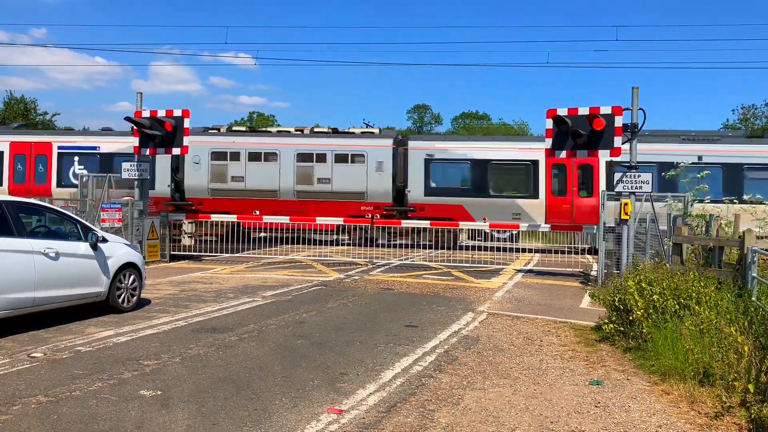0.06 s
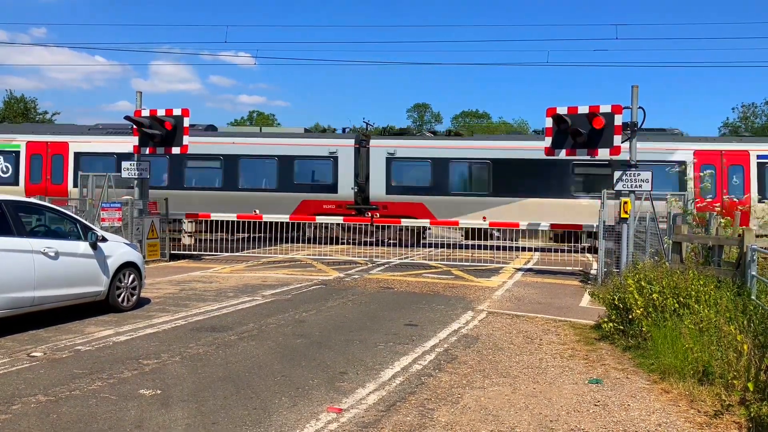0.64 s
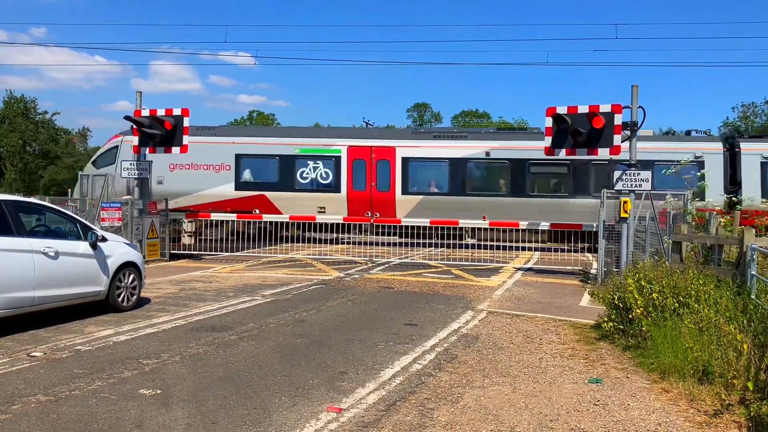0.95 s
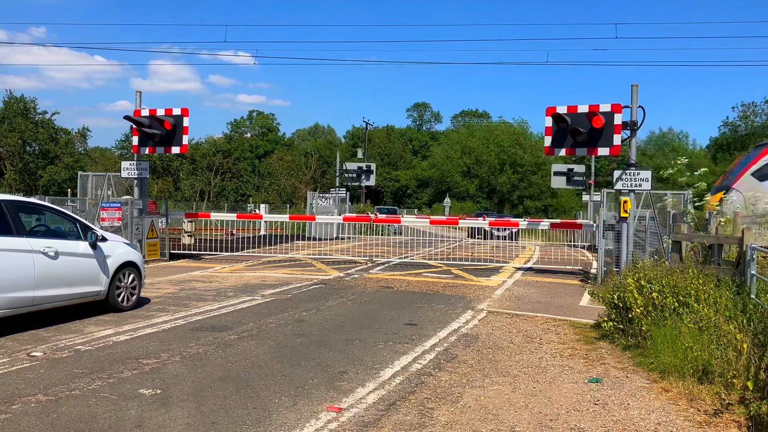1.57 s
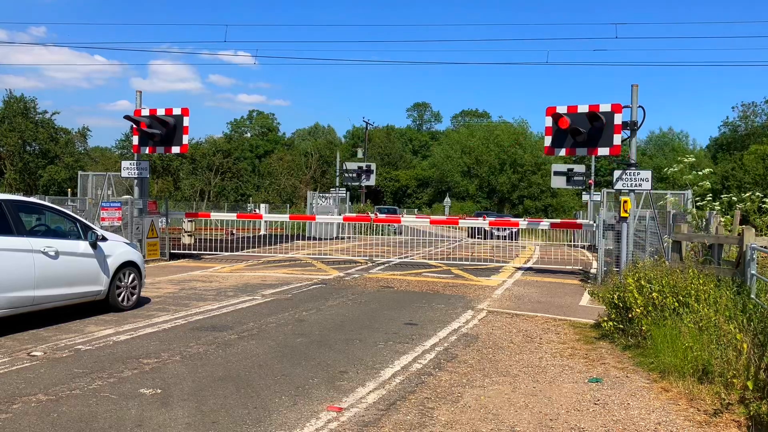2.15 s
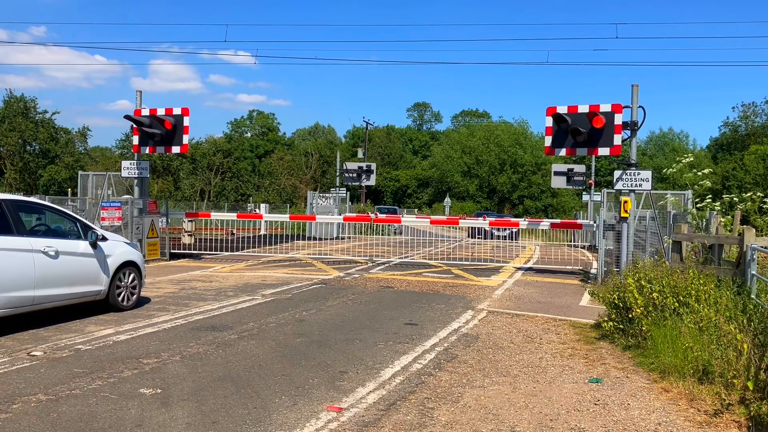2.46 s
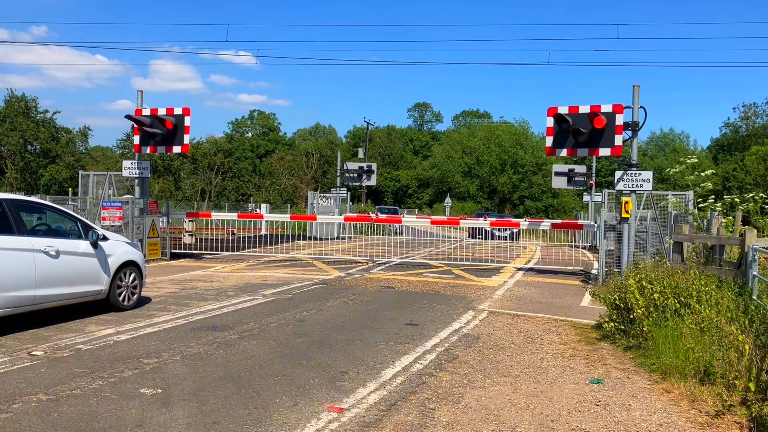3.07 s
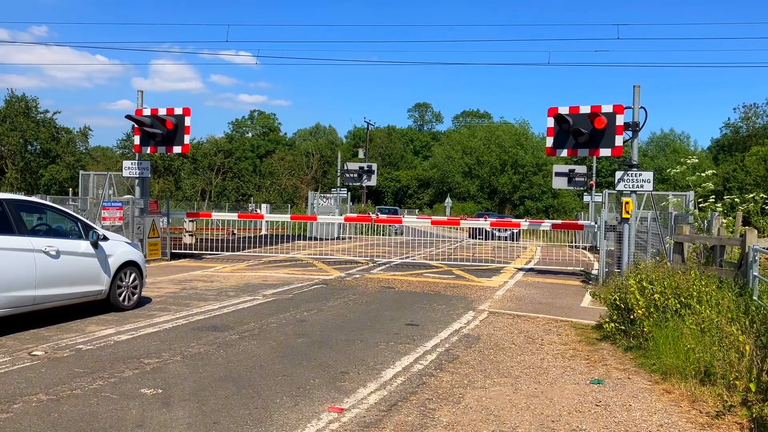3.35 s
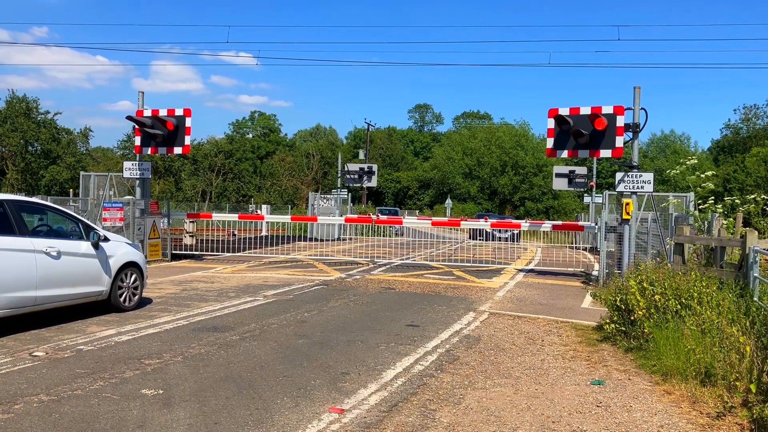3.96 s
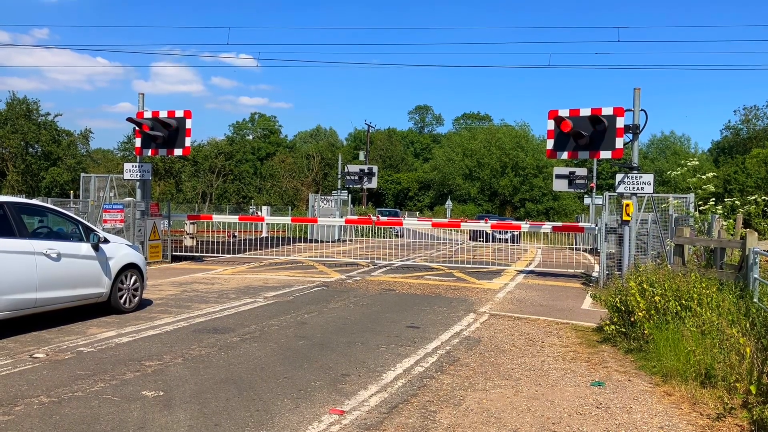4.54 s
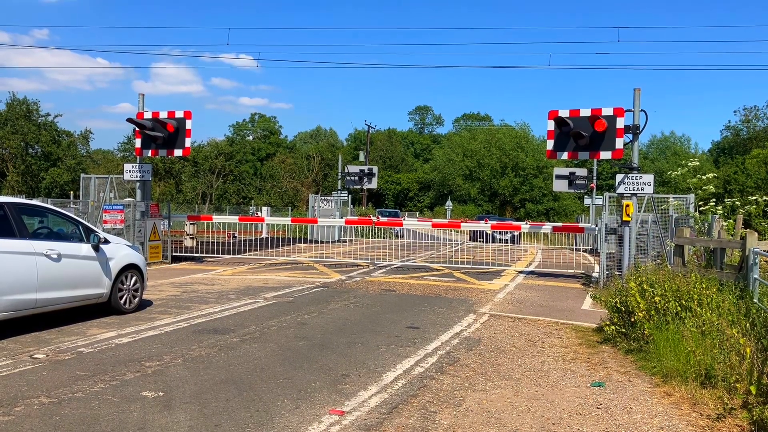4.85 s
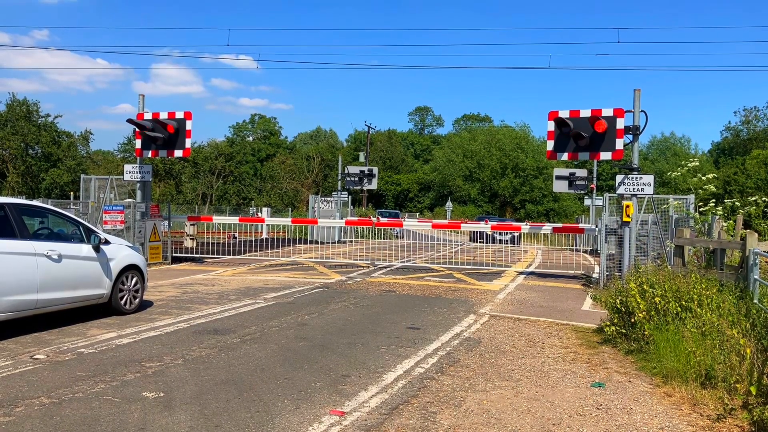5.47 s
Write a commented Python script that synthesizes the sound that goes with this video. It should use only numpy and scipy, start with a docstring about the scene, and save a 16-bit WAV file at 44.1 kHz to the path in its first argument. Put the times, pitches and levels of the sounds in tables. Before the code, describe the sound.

Heard in stereo from a short way back from the track, in open country air, a train passes loudly with paired wheel knocks, steel ringing and hiss. Its roar dulls and fades off to the right, leaving a soft, steady hum from the crossing barrier. Then a car slightly to the left clicks, cranks, catches and idles, much quieter than the train. Last comes a single thin bird whistle.

```python
"""A passenger train rushes past, roaring and hissing, its wheels thumping in pairs over a country crossing.
From a stereo microphone 26 m off the track it rumbles away to the right with singing wheels
and gliding bands of hiss. The barrier's drive hums throughout. To the left of the microphone a waiting
car clunks its starter, fires and settles into idle. Last, a small bird calls once in the open air."""
import sys
import numpy as np
from scipy import signal
from scipy.fft import rfft, irfft
from scipy.io import wavfile
from scipy.ndimage import uniform_filter1d

SR = 44100
rng = np.random.default_rng(int(sys.argv[2]) if len(sys.argv) > 2 else 0)


def unload_audio(sound):
    """Save the sound as a 16-bit wav file, at the path given as the first command line argument."""
    columns = np.transpose(np.atleast_2d(sound))
    # keep every value between -1 and 1, then stretch to whole-number steps
    steps = np.round(np.clip(columns, -1, 1) * 32767)
    wavfile.write(sys.argv[1], SR, steps.astype(np.int16))


N = 242991
TIME = np.arange(N) / SR
FREQS = np.maximum(np.fft.rfftfreq(N, 1 / SR), 1)

TRACK_DISTANCE_M, TRAIN_M_PER_S, SOUND_M_PER_S = 26, 34.3, 343
TAIL_S = 1.271   # the last carriage draws level with the microphone
DOWN_LINE_LAG_MS, CAR_LAG_MS = 0.32, -0.23   # left channel behind right: positive lies to the right

# sound reaching the microphone straight from its source: (frequency [Hz], share [0..1])
DIRECT_SHARE = [(100, 0.94), (600, 0.8), (1200, 0.62), (2100, 0.26), (3000, 0.18), (5000, 0.1), (8000, 0)]
# how alike the two microphone ports hear scattered sound: (frequency [Hz], likeness [-1..1])
PORT_LIKENESS = [(100, 0.97), (500, 0.03), (1500, -0.29), (3300, -0.49), (6000, 0.05), (7300, 0.7),
                 (9100, -1), (11000, 0.96), (12100, 0.65), (13500, -0.85)]
# spectra of the ground, the bogies, the roar close by and far off, and the treble hiss:
# (frequency [Hz], relative density [dB])
GROUND_SPECTRUM = [(28, -53), (35, -18), (43, -5), (52, 1.5), (70, -0.5), (90, -8), (125, -13),
                   (170, -22.5), (400, -58)]
BOGIE_SPECTRUM = [(80, -14), (140, -6), (215, -1), (290, -6), (380, -7.5), (550, -6), (720, -22),
                  (1100, -26)]
NEAR_ROAR_SPECTRUM = [(450, -51), (720, -11), (900, 1.5), (1040, -2), (1300, -5.5), (1600, -6),
                      (2000, -3.5), (2380, -9), (2700, -13), (4000, -72)]
FAR_ROAR_SPECTRUM = [(300, -3), (500, -1), (750, -1.5), (900, 2), (1080, -4), (1300, -4), (1700, -11.5),
                     (2200, -12), (2480, -33), (2850, -16.5), (3500, -18.5), (3850, -27), (4300, -22),
                     (5300, -22)]
HISS_SPECTRUM = [(2400, 2.5), (3000, 4), (3700, 4.5), (4500, -1), (6000, -3.5), (7400, -5.5), (9500, -12),
                 (12000, -12), (15500, -22.5)]
# low rumble at the microphone, fading unevenly as the train leaves: (time [s], level [dB])
GROUND_LEVELS = [(0.0, -20.5), (0.6, -18.5), (1.35, -23.5), (1.85, -27.5), (2.05, -33), (2.5, -35),
                 (2.68, -37.5), (3.1, -40), (3.23, -44), (3.32, -37), (3.6, -39), (3.75, -44.5),
                 (4.2, -43.5), (5.5, -44)]
# carriages going by, before trim and distance loss: (time [s], roar level [dB], hiss level [dB])
CARRIAGE_LEVELS = [(0.0, -25.5, -34.5), (0.11, -25.5, -37), (0.28, -23, -36.5), (0.45, -23.5, -34.5),
                   (0.555, -26, -39), (0.70, -26, -38.5), (0.86, -25, -37), (1.004, -25.5, -42),
                   (1.05, -22.5, -36), (1.182, -23, -38.5), (1.375, -25.5, -39), (1.43, -28, -44),
                   (1.65, -30, -45.5), (2.25, -29.8, -45), (2.7, -25.5, -46.5), (3.9, -18.5, -51)]
# steel wheels ringing as they roll: (frequency [Hz], width [Hz], relative level [dB])
ROLLING_NOTES = [(957, 34, -4), (1044, 30, -3), (1199, 29, -10.5), (1547, 22, -6.5), (1750, 20, -12.5),
                 (2005, 18, -8.5), (2350, 18, -9.5), (4160, 31, -21.5), (4350, 28, -18.5), (5050, 30, -19),
                 (5300, 38, -23)]
# how distance colours the hiss: (frequency [Hz], gain [dB])
FAR_HISS_EQ = [(3000, 2), (5200, -4.5), (6600, -1.5), (7600, -5), (11000, 0.5)]
# still country air: (frequency [Hz], relative density [dB])
AIR_SPECTRUM = [(30, -33), (48, -10.5), (75, -6), (160, -18.5), (440, -17), (620, -21.5), (830, -19),
                (1050, -18.5), (1550, -29), (2100, -21.5), (2800, -34), (7400, -45.5), (11500, -52),
                (15500, -66)]
# wheels scraping along the rail: (time [s], level [dB])
SCRAPE_HITS = [(0.012, -32), (0.421, -39), (1.047, -35), (1.086, -36), (1.336, -51), (1.49, -28.5),
               (1.548, -33.5)]
# axles striking the crossing, two to a bogie, each striking again at a second joint just beyond: # (time [s],
# knock level [dB], thud level [dB], delay to second strike [s], second strike gain [dB])
AXLE_HITS = [(0.019, -16.5, -15, 0.028, -2.5), (0.088, -25.5, -18, 0.026, -4.5),
             (0.378, -12, -22, 0.02, -11), (0.451, -20, -19.5, 0.016, -1.5),
             (0.582, -12.5, -15, 0.021, -10.5), (0.654, -19.5, -15, 0.022, -14),
             (1.015, -14.5, -22.5, 0.028, -5), (1.098, -21.5, -16.5, 0.023, -6),
             (1.462, -17.5, -26, 0.026, 0), (1.535, -14.5, -22.5, 0.03, -6.5)]
# resonances rung by a scrape, a knock and a thud: (frequency [Hz], width [Hz], gain [dB])
SCRAPE_MODES = [(1630, 200, 7.5), (3600, 630, -5), (4360, 780, 0.5), (5500, 420, 2), (6800, 330, 0),
                (10800, 1200, -6)]
RAIL_MODES = [(377, 76, 24), (463, 73, -17), (560, 31, -3)]
BOGIE_MODES = [(171, 46, -6.5), (216.4, 28, 9.5)]
# flanges grazing the rail: (peak time [s], half length [s], frequency [Hz], width [Hz], level [dB])
FLANGE_GRAZES = [(0.22, 0.098, 2334, 170, -34.5), (0.79, 0.051, 992, 110, -26.5),
                 (0.889, 0.027, 1880, 170, -28.5), (1.164, 0.025, 2154, 200, -31),
                 (1.175, 0.029, 1067, 140, -19.5), (1.238, 0.011, 1950, 240, -25),
                 (1.253, 0.034, 1082, 140, -23.5), (1.322, 0.017, 1160, 140, -23),
                 (1.385, 0.013, 1003, 60, -26)]
# notes of the departing wheels: (far-off frequency [Hz], width [Hz], peak level [dB], fall [dB/s])
SINGING_NOTES = [(1060, 38, -42, 5), (2070, 58, -52.5, 11), (3600, 49, -59, 6.5), (3840, 34, -58.5, 22),
                 (4170, 73, -69, 10)]
# narrow, gliding bands of hiss:
# (start [s], end [s], start frequency [Hz], end frequency [Hz], width [Hz], start level [dB])
HISS_BANDS = [(1.4, 2.364, 7230, 7050, 200, -57), (1.58, 2.292, 4500, 4260, 220, -50.5),
              (2.15, 3.156, 3400, 3010, 180, -55.5), (2.3, 3.102, 5860, 6330, 330, -64)]
# the car's starter, relay first and then pinion: (time [s], level [dB])
STARTER_CLICKS = [(3.831, -59), (4.072, -52), (4.078, -54), (4.128, -48)]
# spectrum of those clicks: (frequency [Hz], relative density [dB])
CLICK_SPECTRUM = [(1000, -7), (3300, 7), (5000, -4), (7500, -1), (11500, -7), (14000, -22)]
# the pinion ringing against the flywheel: (frequency [Hz], width [Hz], gain [dB])
PINION_MODES = [(345, 72, 9), (502, 60, 18.5), (950, 120, -8), (1580, 160, 7), (3300, 280, -29)]
# the engine from cranking to idle: (time [s], firing rate [Hz], exhaust level before trim [dB])
ENGINE_RUN = [(4.12, 29, -50.5), (4.204, 38.5, -48), (4.3, 48.2, -41), (4.40, 54, -39),
              (4.562, 55.6, -28.5), (4.654, 58.5, -28), (4.81, 54.3, -34.5), (5.164, 51, -35),
              (5.5, 47, -35.5)]
# exhaust tones: (multiple of the firing rate [ratio], relative level [dB])
EXHAUST_ORDERS = [(.5, -21), (1, -0.5), (1.5, -14), (2, -25), (2.5, -35), (3, -24.5), (3.5, -24.5),
                  (4, -26.5)]
# spectra of the engine block and its clatter: (frequency [Hz], relative density [dB])
BLOCK_SPECTRUM = [(70, 4.5), (170, 1), (300, -5), (450, -5.5), (750, -25), (1050, -11), (1500, -12),
                  (2100, -21), (3000, -26.5), (6000, -25)]
CLATTER_SPECTRUM = [(1000, -9), (2200, 3), (3200, 5.5), (4200, -2), (5200, -2), (6300, -5), (7500, 2),
                    (9000, -6), (11500, 1), (15500, -12)]
# the first hard firings knocking on the engine mounts: (time [s], level [dB])
MOUNT_JOLTS = [(4.558, -36.5), (4.624, -45), (4.652, -39)]
# resonances of the mounts: (frequency [Hz], width [Hz], gain [dB])
MOUNT_MODES = [(160, 70, 3), (240, 70, 18), (330, 70, -9)]
# a thin bird call: (time [s], frequency [Hz], level [dB])
BIRD_CALL = [(5.265, 7350, -78), (5.29, 7740, -61), (5.315, 7290, -71), (5.328, 7160, -61),
             (5.36, 7230, -57), (5.39, 7200, -59), (5.445, 7190, -65), (5.47, 7190, -83)]


def from_db(db):
    """Decibels to gain."""
    return 10 ** (np.asarray(db) / 20)


def unit_rms(x):
    """Scale to unit power."""
    return x / np.sqrt(np.mean(x ** 2) + 1e-20)


def over_time(rows):
    """Each column of a timed table, read at every sample."""
    times, *columns = np.transpose(rows)
    return [np.interp(TIME, times, column) for column in columns]


def over_hz(points):
    """A table read at every frequency, on a log axis."""
    hz, value = np.transpose(points)
    return np.interp(np.log(FREQS), np.log(hz), value)


def ramp(start_s, length_s):
    """An even rise from 0 to 1."""
    return np.clip((TIME - start_s) / length_s, 0, 1)


def bump(centre_s, width_s):
    """A smooth swell from 0 up to 1 and back."""
    return np.exp(-((TIME - centre_s) / width_s) ** 2)


def drift(rate_hz):
    """Random wander of spread 1, mostly slower than the given rate."""
    coarse = np.linspace(0, TIME[-1], 16384)
    hz = np.fft.rfftfreq(len(coarse), coarse[1])
    smoothed = irfft(rfft(rng.standard_normal(len(coarse))) / (1 + (hz / rate_hz) ** 2))
    return np.interp(TIME, coarse, unit_rms(smoothed))


def at_mic(x, lag_ms, pan_db):
    """A point source in stereo: positive lag delays the left channel, positive pan makes it louder."""
    channels = [np.interp(TIME - side * lag_ms / 2000, TIME, x) for side in (1, -1)]
    return np.array(channels) * from_db(np.array([[.5], [-.5]]) * pan_db)


def outdoor_noise(spectrum, lag_ms, flutter_db, flutter_hz, pan_db, remoteness=1):
    """Fluttering noise of rms 1; the more remote, the more of it reaches the microphone scattered."""
    skirts = (1 + (spectrum[0][0] / FREQS) ** 4) * (1 + (FREQS / spectrum[-1][0]) ** 8)
    straight, mid, side = rfft(rng.standard_normal((3, N))) * from_db(over_hz(spectrum)) / skirts
    share = np.clip(over_hz(DIRECT_SHARE), .001, 1) ** remoteness
    alike = np.clip(over_hz(PORT_LIKENESS), -1, 1)
    diffuse = mid * np.sqrt((1 + alike) / 2) + side * np.sqrt((1 - alike) / 2) * [[1], [-1]]
    direct = at_mic(irfft(straight * np.sqrt(share), N), lag_ms, pan_db)
    scattered = irfft(diffuse * np.sqrt(1 - share), N)
    return unit_rms((direct + scattered) * from_db(flutter_db * drift(flutter_hz)))


def evened(x, seconds):
    """Take out swells slower than the given time."""
    return x / np.sqrt(uniform_filter1d(np.mean(x ** 2, axis=0), int(seconds * SR)) + 1e-9)


def rough_tone(hz, width_hz):
    """A resonance shaken at random: a tone of wandering strength and phase."""
    phase = 2 * np.pi * np.cumsum(hz * np.ones(N)) / SR
    return drift(width_hz) * np.cos(phase) + drift(width_hz) * np.sin(phase)


def ringing(notes, swell_db, wander):
    """Steel resonances, each swelling, sinking and wandering in pitch on its own."""
    return sum(from_db(db + swell_db * drift(5.4)) * rough_tone(hz * (1 + wander * drift(4.046)), width)
               for hz, width, db in notes)


def resonate(x, modes):
    """Ring a set of parallel resonances."""
    out = 0
    for hz, width, db in modes:
        radius = np.exp(-np.pi * width / SR)
        poles = [1, -2 * radius * np.cos(2 * np.pi * hz / SR), radius ** 2]
        out = out + from_db(db) * signal.lfilter([1 - radius, 0, radius - 1], poles, x)
    return out


def blows(times, levels_db, modes, rise_s, decay_s, cutoff_hz):
    """Brief rough contacts ring the modes; each level is that of the blow's loudest 15 ms."""
    out, age = np.zeros(N + SR), np.arange(SR // 3) / SR
    lowpass = signal.butter(4, cutoff_hz, fs=SR, output="sos")
    contact = (1 - np.exp(-age / rise_s)) * np.exp(-age / decay_s)
    for time_s, db in zip(times, levels_db):
        ring = signal.sosfilt(lowpass, resonate(contact * rng.standard_normal(len(age)), modes))
        loudest = np.sqrt(uniform_filter1d(ring ** 2, size=660).max())
        start = max(int((time_s - rise_s) * SR), 0)
        out[start:start + len(age)] += from_db(db) * ring / loudest
    return out[:N]


def receding(gone_m, reach_m, loss_db_per_m):
    """Gain of a departing source: inverse distance beyond its reach, and loss to air and hedges."""
    return from_db(-loss_db_per_m * gone_m) / np.hypot(1, gone_m / reach_m)


def train_rumble(gone_m, lag_ms):
    """Rough wheels shake the ground and set the bogies droning while the train is close."""
    ground_db, = over_time(GROUND_LEVELS)
    ground = outdoor_noise(GROUND_SPECTRUM, lag_ms, flutter_db=-3, flutter_hz=2, pan_db=-1.5)
    bogies = outdoor_noise(BOGIE_SPECTRUM, lag_ms, flutter_db=-1, flutter_hz=7.1, pan_db=-0.5)
    bogie_gain = from_db(-24.5) * receding(gone_m, reach_m=5.9, loss_db_per_m=0.26)
    return evened(ground, seconds=0.32) * from_db(ground_db) + evened(bogies, seconds=0.031) * bogie_gain


def train_roar(gone_m, lag_ms):
    """Wheels roar, ring and hiss on the rails, turning duller as they leave the microphone behind."""
    roar_db, hiss_db = over_time(CARRIAGE_LEVELS)
    far = 1 - np.exp(-(gone_m / 23) ** 2)   # the distant colour takes over around 23 m down the line
    near_roar = outdoor_noise(NEAR_ROAR_SPECTRUM, lag_ms, flutter_db=1.53, flutter_hz=28,
                              pan_db=1, remoteness=0.68)
    wheel_ring = ringing(ROLLING_NOTES, swell_db=3, wander=0.009)
    near_roar += at_mic(wheel_ring, lag_ms, pan_db=0.5) * from_db(-9.5)
    far_roar = outdoor_noise(FAR_ROAR_SPECTRUM, lag_ms, flutter_db=1.6, flutter_hz=30,
                             pan_db=-2.5, remoteness=0.88)
    roar = np.sqrt(1 - far) * near_roar * from_db(-0.52) + np.sqrt(far) * far_roar * from_db(4.5)
    roar *= from_db(roar_db) * receding(gone_m, reach_m=29.7, loss_db_per_m=0.27)
    near_hiss = outdoor_noise(HISS_SPECTRUM, lag_ms, flutter_db=1.02, flutter_hz=18, pan_db=-2)
    far_hiss = irfft(rfft(near_hiss) * from_db(over_hz(FAR_HISS_EQ)), N)
    hiss = (1 - far) * near_hiss + far * far_hiss
    rail_borne = 1 / (1 + (gone_m / 31.4) ** 2.93)   # treble carried along the rails holds up, then dies
    return roar + hiss * from_db(hiss_db + 3) * rail_borne


def country_air():
    """The open air around the crossing: a faint, low wash, stronger on the right."""
    return from_db(-44.5) * outdoor_noise(AIR_SPECTRUM, 0.14, flutter_db=1.5, flutter_hz=17, pan_db=-6.5)


def barrier_hum(hum_hz=265.3, swell_from_s=2.92, swell_db_per_s=2.5):
    """The barrier's drive hums on one nearly pure, wavering note, even at first, then slowly louder."""
    phase = 2 * np.pi * np.cumsum(hum_hz * (1 + 0.0028 * drift(5.4))) / SR
    note = np.sin(phase) + from_db(-21) * np.sin(2 * phase) + from_db(-19) * np.sin(4 * phase)
    level_db = -51 + swell_db_per_s * np.maximum(TIME - swell_from_s, 0) + 0.66 * drift(4.8)
    return at_mic(np.sqrt(2) * note * from_db(level_db), lag_ms=0.02, pan_db=2)


def wheel_scrapes():
    """Now and then a wheel scrapes the rail, bright and spread wide across both channels."""
    times, levels_db = np.transpose(SCRAPE_HITS)
    return np.array([blows(times, levels_db, SCRAPE_MODES, rise_s=0.012, decay_s=0.031, cutoff_hz=10100)
                     for channel in range(2)])


def axle_thumps(lag_ms):
    """At the crossing each axle knocks the rail, thuds through its bogie and strikes once more at a second
    joint just beyond."""
    strike_s, knock_db, thud_db, second_strike_s, second_strike_db = np.transpose(AXLE_HITS)
    times = np.concatenate([strike_s, strike_s + second_strike_s])
    knock_db = np.concatenate([knock_db, knock_db + second_strike_db])
    thud_db = np.concatenate([thud_db, thud_db + second_strike_db])
    knocks = blows(times, knock_db, RAIL_MODES, rise_s=0.00599, decay_s=0.016, cutoff_hz=810)
    thuds = blows(times, thud_db, BOGIE_MODES, rise_s=0.004, decay_s=0.012, cutoff_hz=446)
    return at_mic(knocks + thuds, lag_ms, pan_db=-2)


def flange_cries(lag_ms, sag_per_s=0.4):
    """Flanges graze the rail: rough metallic notes that sink in pitch as each wheel goes by."""
    cries = 0
    for peak_s, half_s, hz, width, db in FLANGE_GRAZES:
        sinking_hz = hz * (1 - sag_per_s * np.clip(TIME - peak_s, -.5, .5))
        cries += rough_tone(sinking_hz, width) * bump(peak_s, half_s) * from_db(db)
    return at_mic(cries, lag_ms, pan_db=-1)


def wheel_singing(away_m_per_s, lag_ms, peak_s=2.14, rise_db_per_s=12):
    """The departing wheels ring on a few narrow notes, which sink with the Doppler shift."""
    doppler = (SOUND_M_PER_S + TRAIN_M_PER_S) / (SOUND_M_PER_S + away_m_per_s)
    since_peak = TIME - peak_s
    notes = [(hz * doppler, width, db + np.minimum(rise_db_per_s * since_peak, -fall * since_peak))
             for hz, width, db, fall in SINGING_NOTES]
    return at_mic(ringing(notes, swell_db=0.5, wander=0.002964), lag_ms, pan_db=3)


def gliding_hiss(fade_s=0.12, fall_db_per_s=14):
    """Narrow bands of hiss that glide in pitch as the train draws away."""
    out = 0
    for start, end, start_hz, end_hz, width, db in HISS_BANDS:
        hz = start_hz + (end_hz - start_hz) * ramp(start, end - start)
        envelope = ramp(start, fade_s) * (1 - ramp(end - fade_s, fade_s))
        shared, left, right = (rough_tone(hz, width) for _ in range(3))
        band = (shared + np.array([left, right])) / np.sqrt(2)
        out += band * envelope * from_db(db - fall_db_per_s * (TIME - start))
    return out


def distant_boom(lag_ms):
    """A brief low boom from far down the line."""
    boom = rough_tone(hz=135, width_hz=10) * bump(centre_s=3.3, width_s=0.33)
    return at_mic(boom, lag_ms, pan_db=1) * from_db(-50.5)


def car_starter():
    """Left of the microphone the starter clicks; on the last click the pinion meets the flywheel."""
    times, click_db = np.transpose(STARTER_CLICKS)
    age = TIME - times[:, None]
    bursts = from_db(click_db)[:, None] * (age >= 0) * np.exp(-np.abs(age) / 0.014)
    noise = outdoor_noise(CLICK_SPECTRUM, CAR_LAG_MS, flutter_db=1, flutter_hz=450, pan_db=2)
    clunk = blows(times[-1:], [-31.5], PINION_MODES, rise_s=0.00206, decay_s=0.0098, cutoff_hz=3650)
    return bursts.sum(0) * noise + at_mic(clunk, CAR_LAG_MS, pan_db=2)


def car_engine():
    """The engine cranks, catches, flares and idles: exhaust tones, a throbbing block and clatter."""
    firing_hz, exhaust_db = over_time(ENGINE_RUN)
    turning, caught = ramp(start_s=4.13, length_s=0.022), ramp(start_s=4.33, length_s=0.14)
    flare = bump(centre_s=4.57, width_s=0.12)
    phase = 2 * np.pi * np.cumsum(firing_hz * (1 + 0.0053 * drift(22))) / SR
    tones = sum(from_db(db + drift(3.3)) * np.sin(order * phase + rng.uniform(0, 2 * np.pi))
                for order, db in EXHAUST_ORDERS)
    exhaust_gain = from_db(exhaust_db + 1.1 + drift(20))   # firings vary by about 1 dB
    exhaust = at_mic(np.sqrt(2) * tones * exhaust_gain, CAR_LAG_MS, pan_db=-1)
    block = outdoor_noise(BLOCK_SPECTRUM, CAR_LAG_MS, flutter_db=1.3, flutter_hz=26,
                          pan_db=4, remoteness=0.36)
    clatter = outdoor_noise(CLATTER_SPECTRUM, CAR_LAG_MS, flutter_db=2, flutter_hz=55,
                            pan_db=-1, remoteness=0.84)
    # the block throbs once a firing, the clatter bursts once a turn
    throb_db = (-2.5 + 3.9 * flare) * np.cos(phase)
    tick_db = (2.1 + 3 * flare) * np.cos(phase / 2 + 0.35 * drift(18)) + 0.71 * drift(25)
    block *= from_db(-48.5 + 4 * flare + throb_db)
    clatter *= from_db(-65 + 8 * flare + tick_db)
    return turning * (exhaust + block) + caught * clatter


def mount_knocks():
    """The first hard firings jolt the engine on its mounts."""
    knocks = blows(*np.transpose(MOUNT_JOLTS), MOUNT_MODES, rise_s=0.0022, decay_s=0.007, cutoff_hz=600)
    return at_mic(knocks, CAR_LAG_MS, pan_db=0)


def bird():
    """A little right of centre, one thin, trembling whistle arches, nearly breaks and then holds."""
    hz, db = over_time(BIRD_CALL)
    calling = (TIME > BIRD_CALL[0][0]) & (TIME < BIRD_CALL[-1][0])
    whistle = np.sin(2 * np.pi * np.cumsum(hz * (1 + 0.00499 * drift(157))) / SR)
    return at_mic(whistle * calling * from_db(db + 2.5 * drift(70)), lag_ms=0, pan_db=-2)


def scene():
    """The crossing from one fixed microphone, the train's bearing swinging to the right as it leaves."""
    gone_m = TRAIN_M_PER_S * np.maximum(TIME - TAIL_S, 0)   # the tail's way down the line
    bearing_sine = gone_m / np.hypot(gone_m, TRACK_DISTANCE_M)
    lag_ms = DOWN_LINE_LAG_MS * bearing_sine
    return (train_rumble(gone_m, lag_ms) + train_roar(gone_m, lag_ms) + country_air() + barrier_hum()
            + wheel_scrapes() + axle_thumps(lag_ms) + flange_cries(lag_ms)
            + wheel_singing(TRAIN_M_PER_S * bearing_sine, lag_ms) + gliding_hiss() + distant_boom(lag_ms)
            + car_starter() + car_engine() + mount_knocks() + bird())


def record(dry):
    """The highest peaks are rounded and the treble is cut above 15.8 kHz."""
    rounded = dry / (1 + (dry / .92) ** 8) ** (1 / 8)
    return signal.sosfilt(signal.ellip(10, .1, 80, 15800, fs=SR, output="sos"), rounded)


dry = scene()
out = record(dry)
unload_audio(out)
```